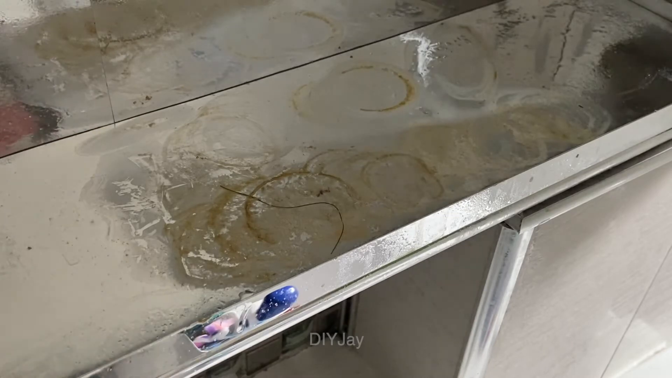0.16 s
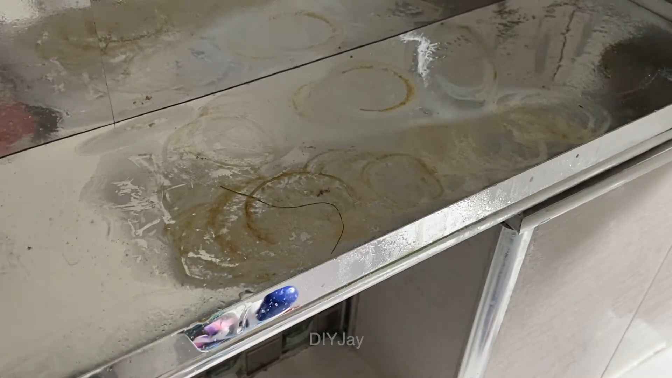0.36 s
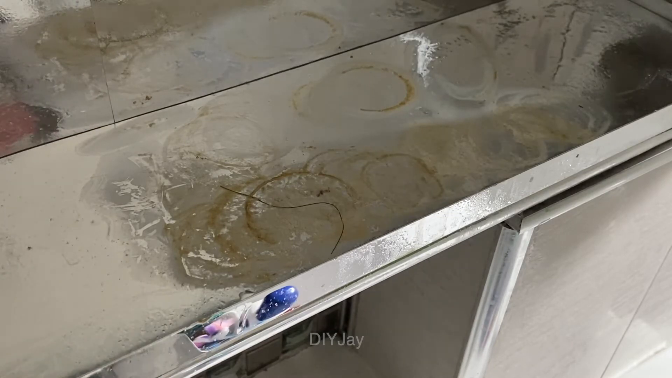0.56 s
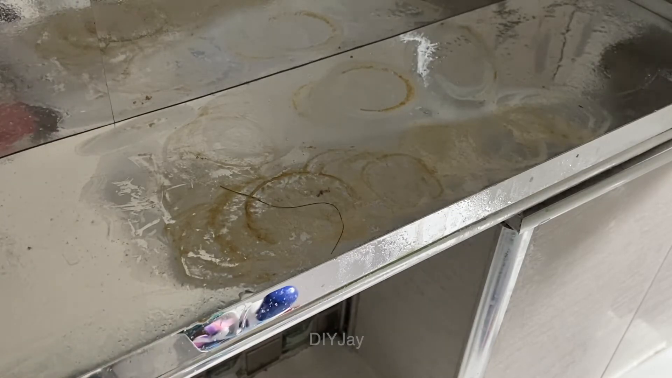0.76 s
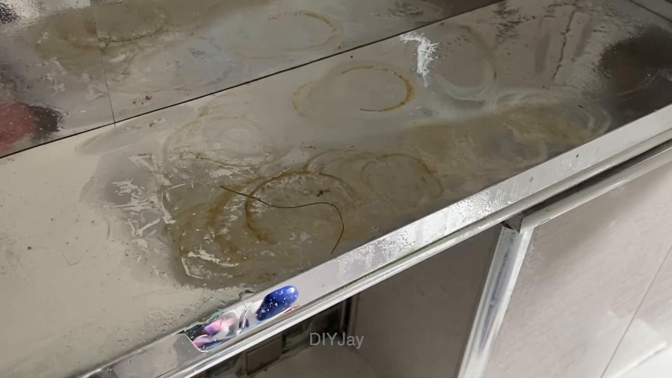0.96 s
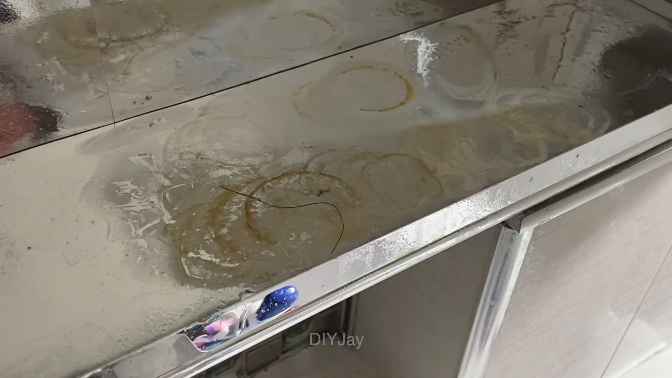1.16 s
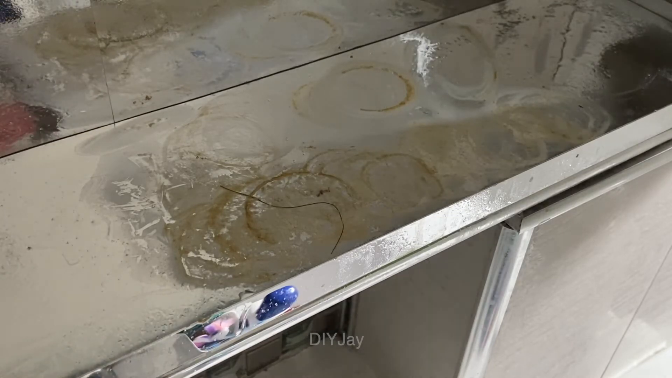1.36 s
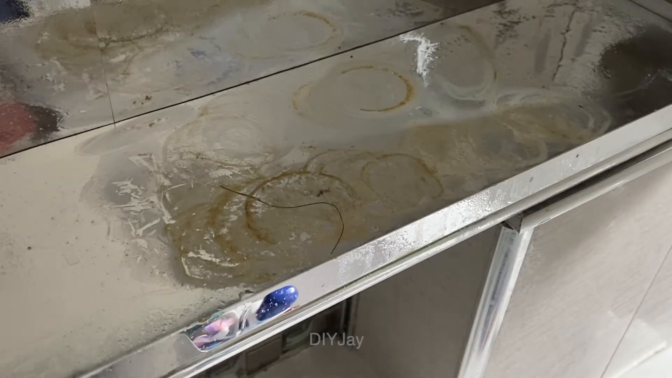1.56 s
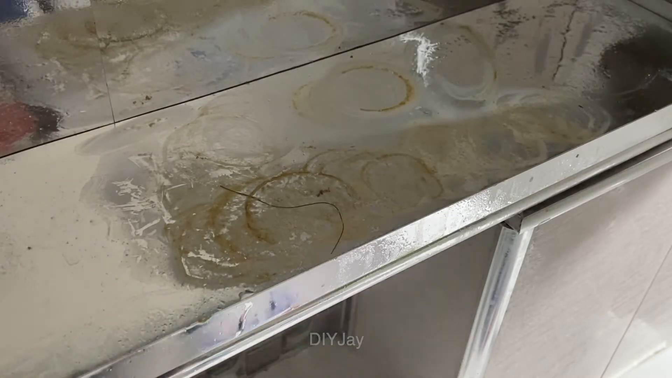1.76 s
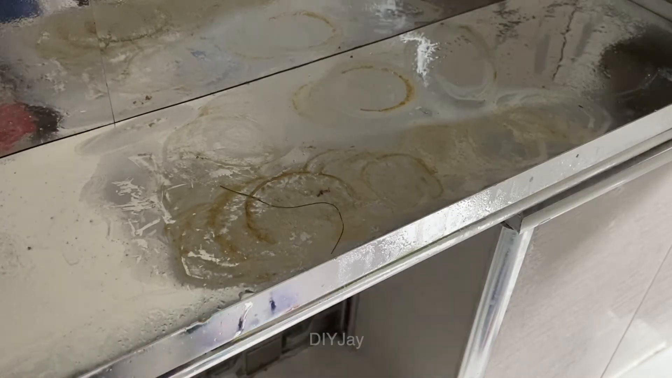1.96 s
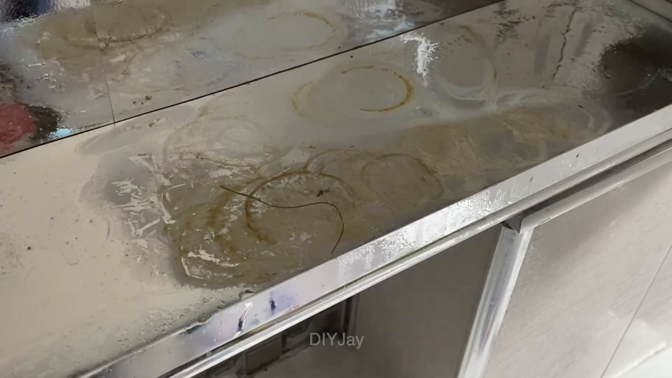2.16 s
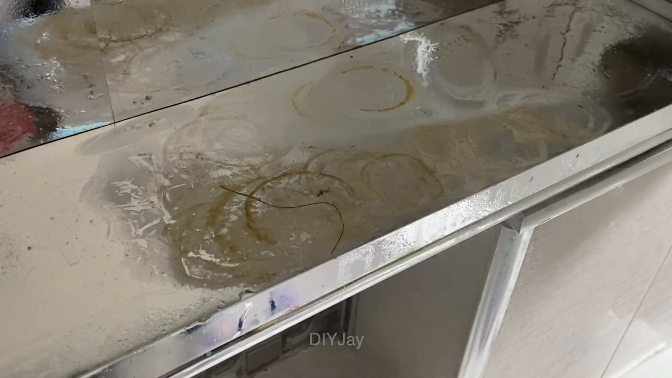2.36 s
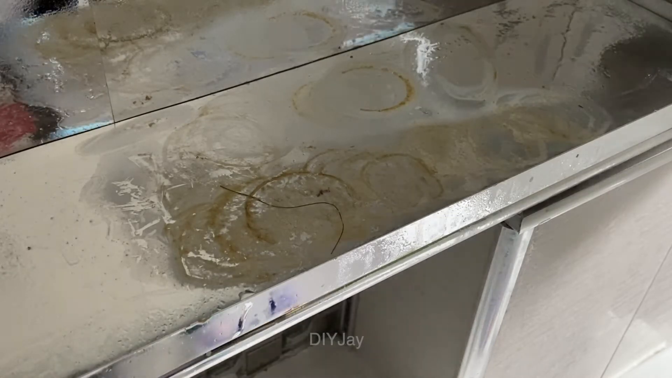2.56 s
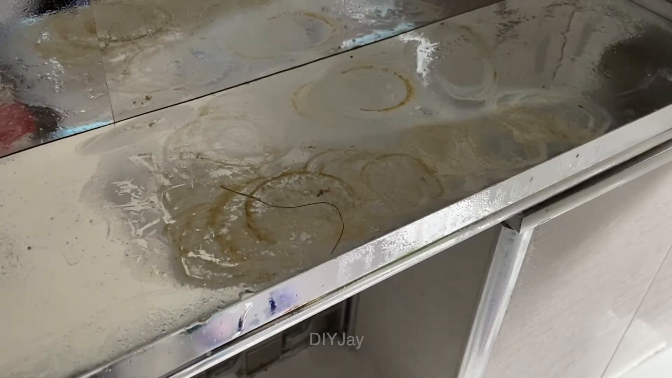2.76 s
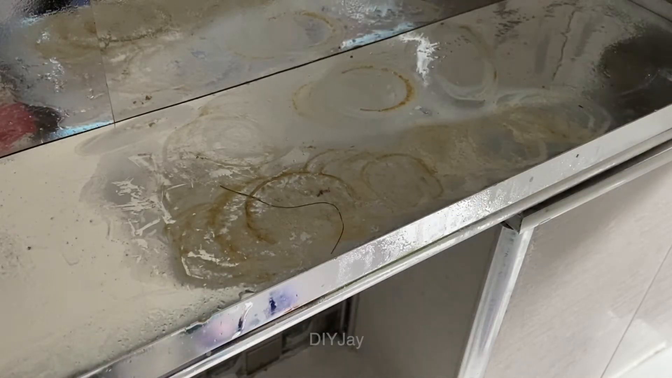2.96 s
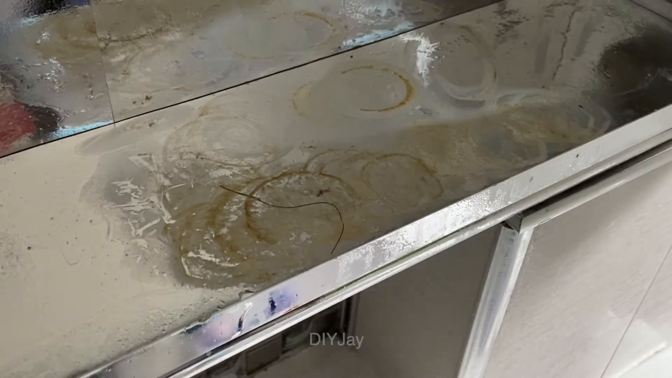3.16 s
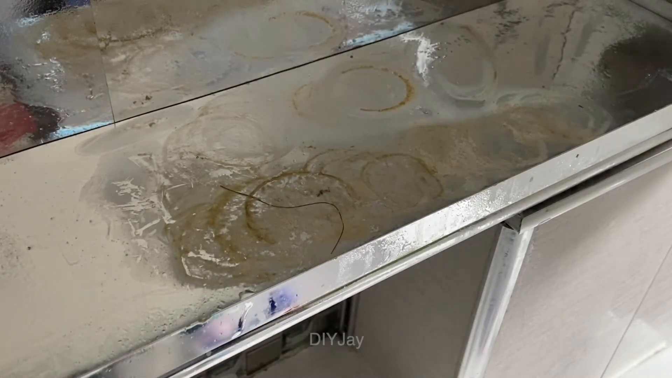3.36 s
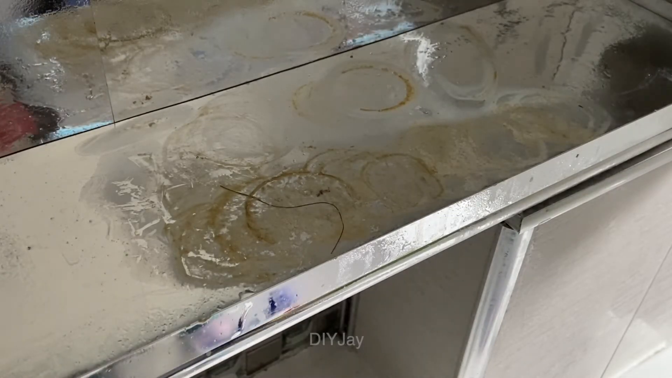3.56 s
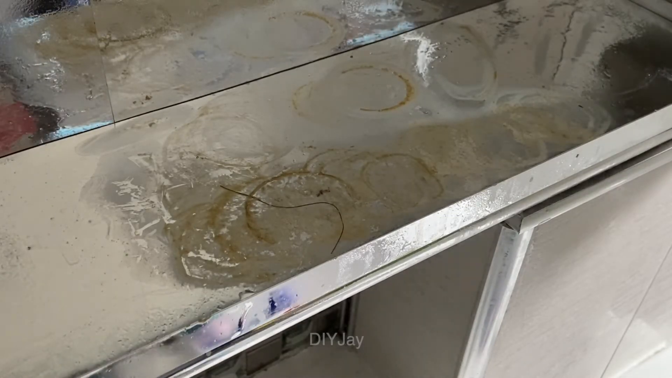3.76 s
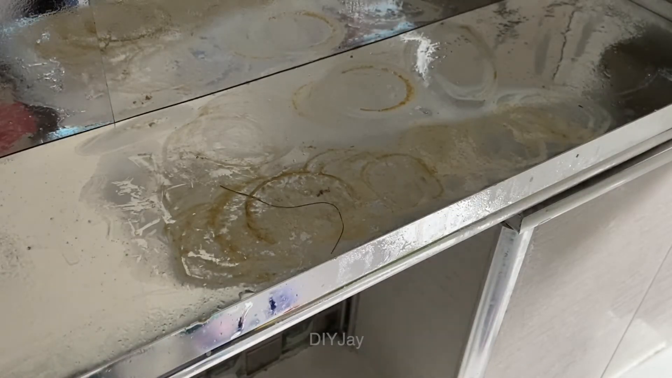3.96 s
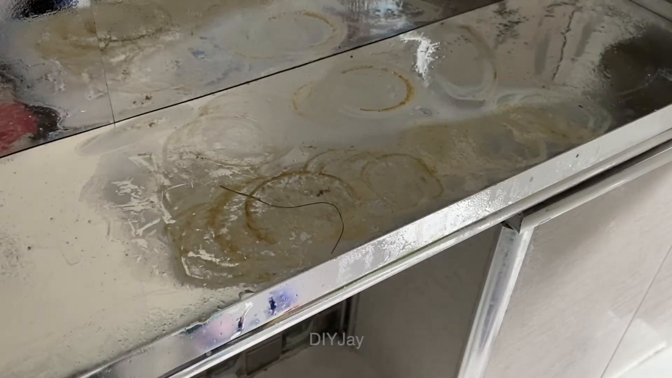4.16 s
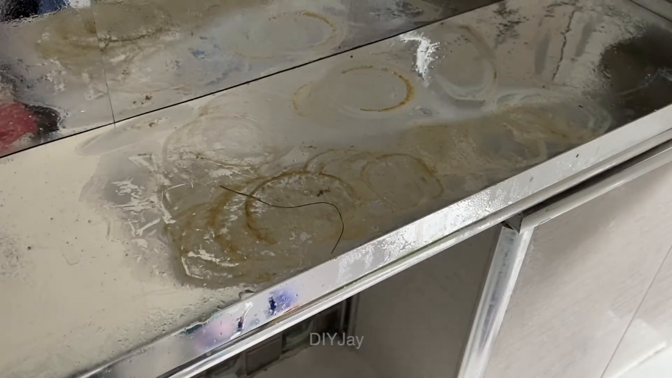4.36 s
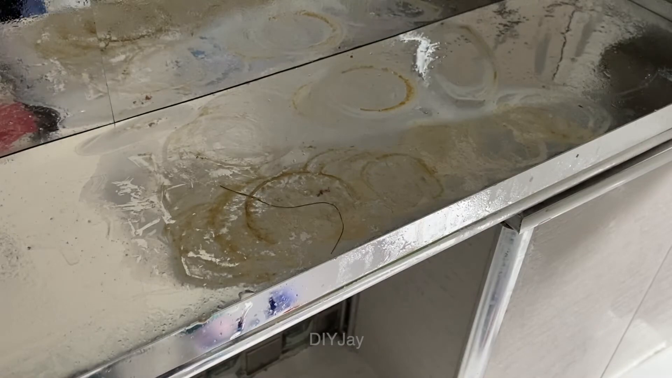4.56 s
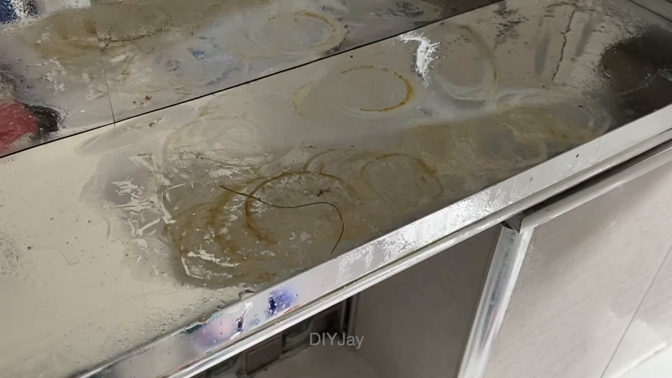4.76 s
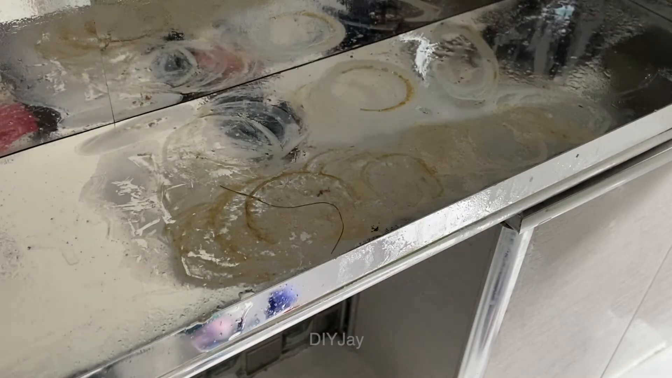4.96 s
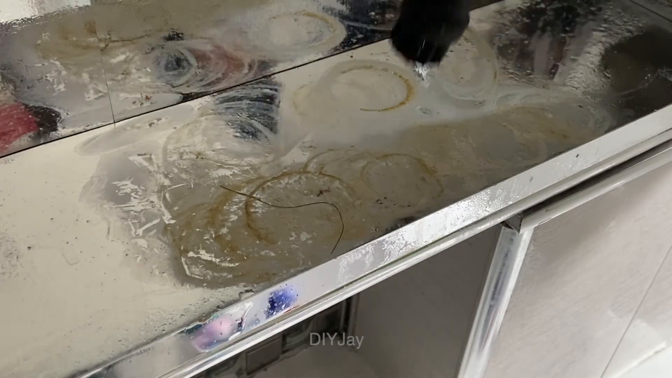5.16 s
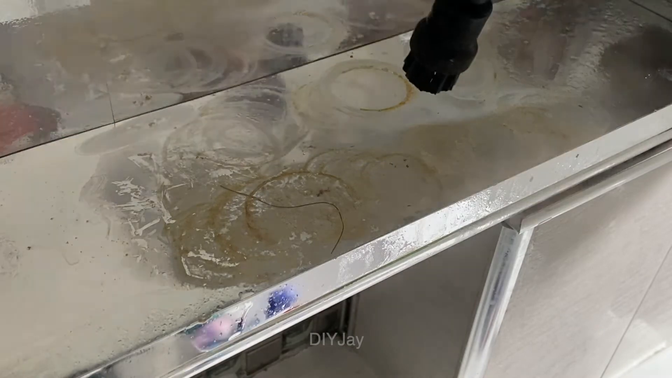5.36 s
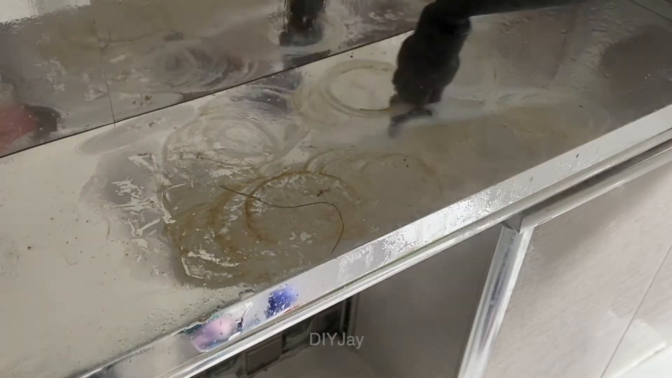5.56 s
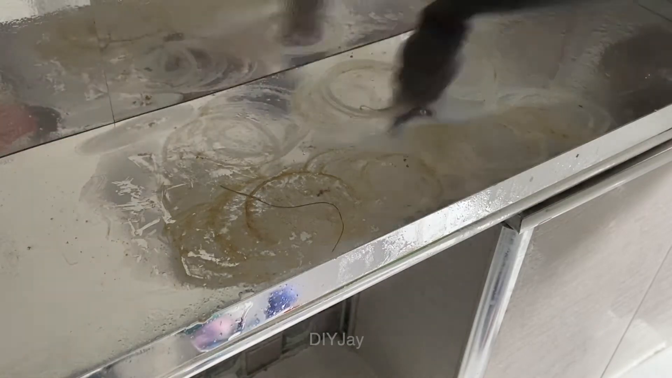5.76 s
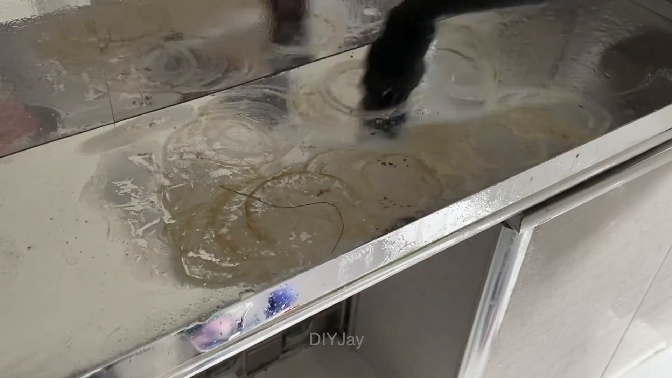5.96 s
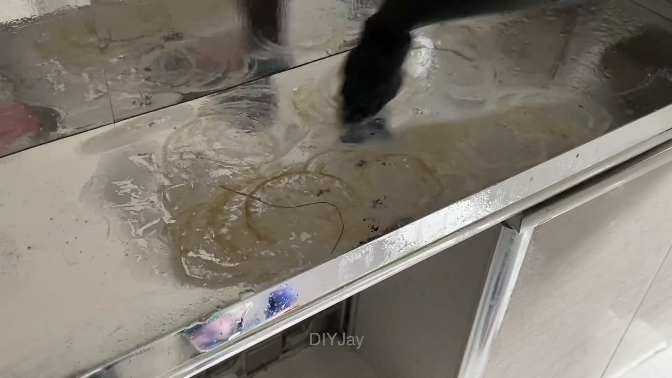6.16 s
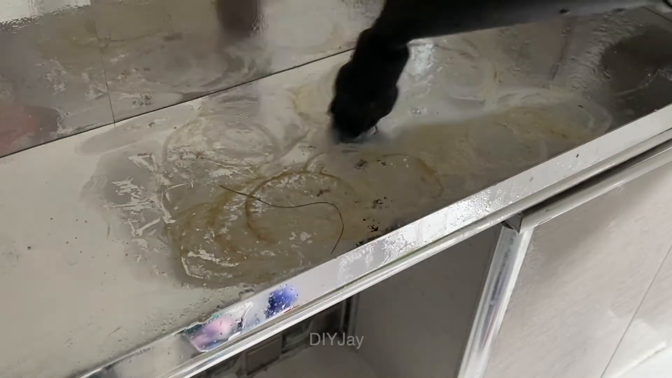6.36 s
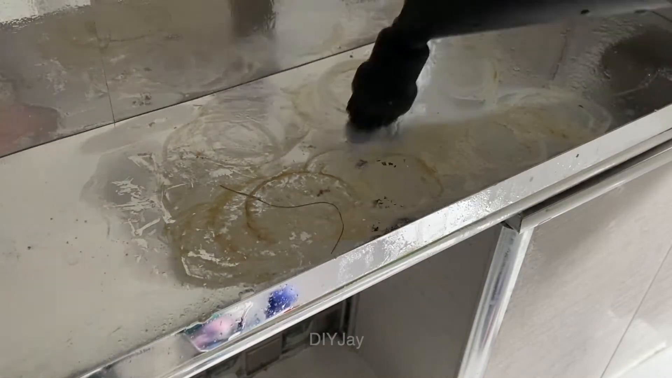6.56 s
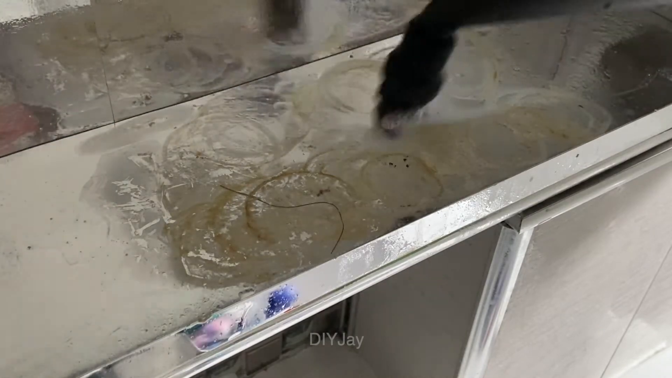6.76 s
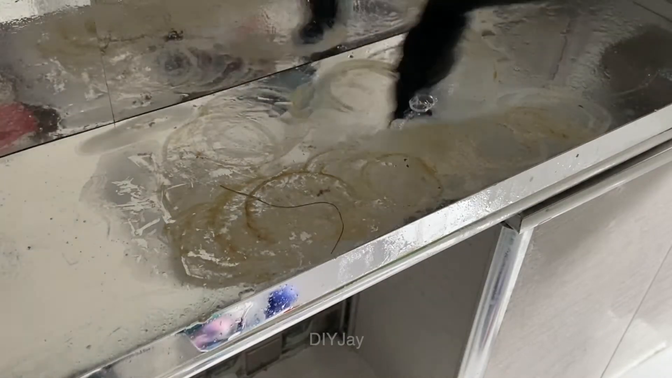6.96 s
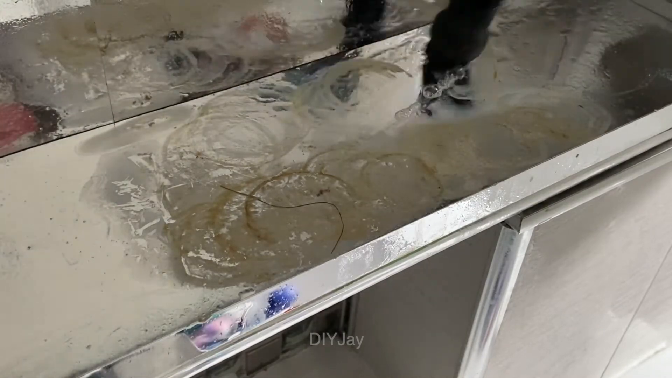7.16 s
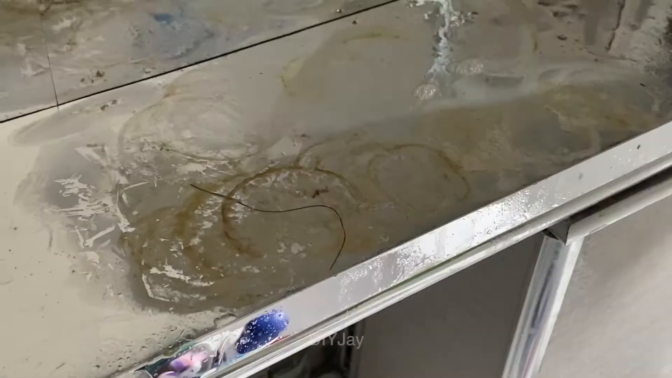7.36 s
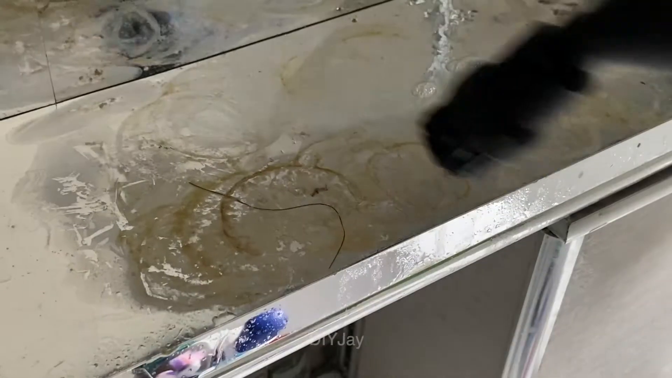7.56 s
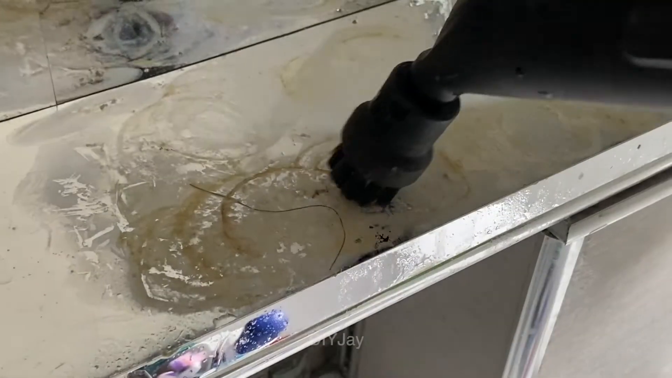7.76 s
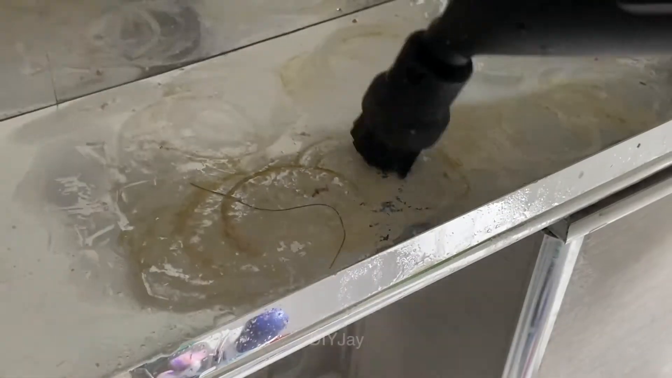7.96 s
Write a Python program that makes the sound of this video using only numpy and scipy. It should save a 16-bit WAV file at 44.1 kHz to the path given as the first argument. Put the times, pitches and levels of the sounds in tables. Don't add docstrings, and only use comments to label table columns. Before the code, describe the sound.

A steam cleaner blasts a long whistling hiss, pauses over a low pump hum with small clicks, then hisses in scrubbing bursts on a worktop.

```python
import sys
import numpy as np
from scipy import signal
from scipy.fft import rfft, irfft, next_fast_len
from scipy.io import wavfile
from scipy.ndimage import uniform_filter1d

SR = 44100
rng = np.random.default_rng(int(sys.argv[2]) if len(sys.argv) > 2 else 0)


def put_to_file(sound):
    columns = np.atleast_2d(sound).T
    safe = np.clip(columns, -1, 1)
    whole_steps = np.round(safe * 32767)
    wavfile.write(sys.argv[1], SR, whole_steps.astype(np.int16))


def to_linear_factor(level_db):
    exponent = np.asarray(level_db, float) / 20
    return 10 ** exponent


N = 353241
FRAME = 1024

# (frequency [Hz], density [dB per Hz])
DRONE_SPECTRUM = [(24, -32), (40, -2.5), (100, -3), (200, 2), (310, -4.5), (450, -14.5), (700, -11.5),
                  (1000, -26.5), (1500, -54.5)]
HUSH_SPECTRUM = [(500, -30), (900, 1), (1700, -2.5), (2500, -6.5), (4000, -10), (8000, -12.5), (14000, -18),
                 (15000, -35)]
# (time [s], length [s], level [dB])
STIRS = [
    (4.38, 0.074, 3),
    (4.63, .11, 10),
    (4.82, 0.045, 4.5),
    (5.1, 0.12, -3),
    (7.46, 0.038, 6),
    (7.63, 0.036, 5),
]
# (frequency [Hz], decay t60 [s])
KITCHEN_DECAY = [(300, 0.43), (2000, 0.37), (6000, 0.35), (12000, 0.25)]
# (start [s], end [s])
ANSWER_GAP = (7.377, 7.7)

# (frequency [Hz], density [dB per Hz])
HOSE_SPECTRUM = [(14, -45.5), (25, -23.5), (45, -5.5), (64, 2.5), (110, -3.5), (170, -4), (260, -16.5),
                 (400, -45.5)]
# (time [s], length [s], level over the rumble [dB])
GRIPS = [(0, 0.036, 13), (.62, 0.054, -4), (.79, 0.096, 9), (1.22, 0.22, 7.5), (1.63, .05, 7),
         (2.32, 0.056, 11.5), (2.74, .07, 9), (2.92, 0.037, 8.5), (3.55, 0.097, -2.5), (3.84, 0.043, 14.5),
         (3.95, .022, 19), (4.85, 0.13, 7), (5.26, .1, 2.5), (5.57, 0.11, -4), (5.84, 0.066, 5),
         (6.31, .06, -0.5), (6.69, 0.055, -1), (7.33, .04, 7.5), (7.715, 0.034, 18.5), (.35, .15, 4),
         (3.3, .04, 1)]

# (time [s], level of the strongest line [dB])
PUMP_LEVEL = [(0, -61.5), (.62, -74.5), (1, -58), (1.87, -58), (3.57, -54), (4.44, -56.5), (4.57, -63.5),
              (4.73, -55), (4.86, -60), (5.15, -55.5), (5.53, -56.5), (5.62, -65), (5.73, -53.5),
              (6.02, -60), (6.6, -55), (6.76, -59.5), (7.36, -56.5), (8.01, -60.5)]
# (multiple of mains, level [dB])
STROKE_LINES = [(2, -19), (3, -9), (4, 0), (5, -21), (6, -16), (8, -26), (9, -23), (10, -30), (14, -28)]

# (time [s], crack [dB], ring [Hz], ring [dB], hollow knock [dB])
TICKS = [(4.487, -66, 5500, -71, -80), (4.808, -59, 2000, -72, -68), (4.823, -67, 3500, -72, -76),
         (7.428, -56, 2410, -61, -70), (7.46, -70.5, 7500, -80, -80), (7.5, -76, 703, -72, -71),
         (7.62, -64, 2000, -64, -68), (7.63, -52, 1053, -49, -65), (7.701, -60.5, 7170, -68, -52),
         (7.708, -63, 1910, -54, -51), (7.723, -61, 5200, -69, -68), (7.739, -51, 3360, -38, -41),
         (7.742, -66, 10700, -54, -70), (7.765, -56, 3280, -48, -38.5)]
# (start [s], end [s])
HANDLE_SPAN = (7.4, 7.69)
# (time [s], peak [dB], settled pitch [Hz], t60 [s], share the pitch starts higher)
THUMPS = [
    (0.73, -30, 51.1, 0.12, .8),
    (2.919, -42, 95.5, 0.15, 1.2),
    (3.926, -31, 110, 0.1, 2.8),
    (7.3066, -31.5, 105, 0.064, 3.7),
    (7.706, -36, 120.8, .1, 1.36),
]
# (time [s], peak [dB], ring [Hz])
BRISTLE_JAMS = [(5.208, -45, 360), (5.315, -33, 815), (5.599, -45, 850), (5.855, -34, 870),
                (5.919, -26, 884), (6.025, -31, 310), (6.112, -29.5, 840), (6.236, -31, 860),
                (6.332, -23, 814), (6.463, -34, 837), (6.693, -44, 890), (6.877, -31.5, 852),
                (6.981, -51, 845), (7.089, -41.5, 770)]

# (valve shuts [s], scattered splash [dB], fizz tilt above 11 kHz [dB per octave])
BURST_ENDS = [
    (3.926, -0.5, 5),
    (7.306, -11, 0.5),
    (8.1, -9, 2.5),
]
# (time [s], level [dB])
FLOW = [
    [(0, -23.5), (.35, -27.5), (.61, -31.5), (.89, -24.5), (1.4, -24.5), (1.81, -29.5), (2.6, -30.5),
     (3.84, -31.5), (3.92, -37)],
    [(5.2, -65), (5.23, -41), (5.6, -30.5), (5.7, -23), (6.05, -29), (6.3, -21.5), (6.72, -23),
     (6.92, -34.5), (7.3, -49)],
    [(7.75, -77), (7.764, -70), (7.784, -37), (7.832, -29.5), (8.01, -28.5)],
]
# (body [dB], splash [dB], fizz under whistle [dB], fizz fade [dB per s], whistle [Hz])
BURST_MIX = [
    (-10.5, -24, -11, 0.87, 6300),
    (-6, -14, -6, 2.5, 6400),
    (-1.5, -12.5, -6, 2.5, 6100),
]
# (frequency [Hz], density [dB per Hz])
BODY_SPECTRUM = [(900, -29.5), (1800, -10.5), (2600, -1.5), (4200, 2.5), (6000, 0), (8000, -12.5),
                 (11000, -33)]
SPLASH_SPECTRUM = [(80, -24), (140, -3.5), (230, -17), (320, -4), (450, -8), (620, -7), (850, -1),
                   (1300, 0), (1600, 1.5), (2100, 2), (3200, -5), (5000, -37)]
FIZZ_SPECTRUM = [(4000, -27.5), (7000, 3), (8500, 0.5), (10000, 1), (13000, -0.5), (15500, 0)]
# (time [s], depth [dB])
FLUTTER = [(0, .8), (2.2, 1.2), (2.6, 2), (3.5, 2), (3.72, 1), (5.2, .6), (8, .8)]
# (time [s], length [s], whole jet [dB], band
# [dB], band [Hz])
SPURTS = [(1, 0.036, -3, -2, 6450), (1.1, 0.036, -7, -2.3, 6330), (1.1, 0.076, 2, 1, 6450),
          (2.27, 0.095, 1.5, 2, 6500), (2.2, 0.05, 0, 6, 6000), (3.3, 0.033, -1, 4.5, 13000),
          (2.69, 0.023, 0.3, 6.5, 5480), (2.85, 0.023, 2.5, 5, 6600), (2.94, 0.021, 0, 11, 4800),
          (3.044, 0.047, 0.5, 12.5, 6630), (3.162, 0.079, -0.7, 6, 4770), (3.7, 0.056, -0.3, 10.5, 7000),
          (3.43, 0.055, -1.2, 8.5, 6700), (3.563, 0.017, .8, 7, 7150), (3.79, 0.045, 4.5, 3.5, 6450),
          (3.89, 0.036, 2, 3.5, 7300), (5.27, 0.084, 2.7, 7, 3270), (2.72, 0.058, 0, 6, 1300),
          (3.113, 0.034, -0.4, 7, 1200), (1.9, 0.23, -0.5, 3.5, 1000), (5.3, 0.15, -0.5, -8.5, 1970),
          (6.4, 0.014, 2.5, 12, 980), (7.4, .3, 0, 2, 4500), (.3, 0.27, 0, 3, 1680),
          (1.4, .15, -0.5, 3.5, 1200), (2.78, 0.078, 0.5, 2, 1250), (.98, 0.22, 0, -2, 8500),
          (7.86, .1, 0, -3.5, 6900), (3.1, 0.55, -0.5, -4, 3800), (7.88, .12, 0, -0.5, 5400),
          (7.9, .12, 0, 1.5, 3600), (3.05, .3, 0, 2, 4700), (2.38, 0.094, 0, 8, 260),
          (5.7, .08, 0, 3, 4100), (6.33, .05, 1, 2, 4300), (6.4, .03, -1, -6, 900), (7.9, .1, 0, 3, 2600),
          (7.9, .1, 0, -2.5, 5750), (.25, .3, 0, 2, 2500), (5.3, .1, 0, -4, 620), (6.36, .03, 0, 3, 5000)]
# (time [s], length [s], level [dB], pitch [Hz])
PIPINGS = [(0.12, 0.085, 1.5, 6720), (0.24, 0.075, 5.5, 7490), (0.37, 0.15, 1.5, 6550),
           (0.48, 0.128, 7, 6550), (0.71, 0.047, 1, 7060), (0.82, 0.066, 5, 6120), (0.94, 0.126, 1, 6800),
           (1.02, 0.035, 1.5, 5250), (1.06, 0.15, 2, 6800), (1.07, 0.15, 2.5, 6890),
           (1.18, 0.079, -2, 6030), (1.18, 0.084, 2, 6120), (1.46, 0.064, 4, 6120), (1.7, 0.053, 1.5, 5770),
           (1.71, 0.098, 2.5, 6800), (1.71, 0.113, 3.3, 6890), (1.96, 0.098, 6, 6370),
           (2.11, 0.067, 4, 7060), (2.34, 0.12, 5, 6460), (2.54, 0.035, 3, 5940), (2.55, 0.065, 6, 7150),
           (2.84, 0.15, 3, 6460), (3.22, 0.079, 8.5, 7240), (3.79, 0.067, 2.5, 6460),
           (5.43, 0.059, 2, 7240), (5.56, 0.137, 3, 5000), (5.56, 0.142, 4, 4820), (5.67, 0.052, 4, 6370),
           (5.84, 0.07, -1.5, 7060), (6.02, 0.15, 2, 6800), (6.09, 0.15, 2, 6800), (6.22, 0.039, 4.5, 3270),
           (6.35, 0.056, 3, 5000), (6.44, 0.032, 5.5, 7840), (6.56, 0.139, 0.5, 6890),
           (6.63, 0.086, 2, 5080), (6.88, 0.049, -1, 6800), (7.79, 0.098, 7.5, 5080),
           (7.86, 0.109, 0.5, 5340), (7.98, 0.03, 5, 6630)]
# (time [s], length [s], whole jet [dB], whistle alone [dB], whistle [Hz])
SCRUBS = [(5.677, 0.047, 0, -1.5, 5100), (5.83, 0.034, 0, 4, 7000), (5.914, 0.048, 2, 0, 5700),
          (6.023, 0.027, 0.5, -2.5, 6800), (6.306, 0.016, 3, 0.5, 6130), (6.352, 0.023, 1.5, 0, 5370),
          (6.443, 0.053, -2, 1.5, 6750), (6.57, 0.04, 0.5, -2, 5330), (6.653, 0.06, -1.2, 3, 6700),
          (6.79, 0.053, -0.5, 1, 5270), (6.91, 0.044, -1, 3.5, 7000), (7.027, 0.041, 2.5, 5.5, 5050),
          (7.092, 0.027, -0.7, 4, 6700), (7.147, 0.02, 3.5, -7, 6350), (7.224, 0.056, 1.5, 7.5, 6620)]
# (time [s], length [s], splash [dB])
SWEEPS = [(.04, .05, 0.5), (1.08, 0.034, 3), (1.55, 0.15, 3), (2.17, 0.026, -6.5), (2.39, 0.077, -4.5),
          (2.66, 0.035, 1.5), (2.87, 0.031, 3), (3.12, 0.017, 2), (3.44, 0.035, -1.5), (3.83, 0.054, 2),
          (5.81, 0.019, 3.5), (6.33, 0.012, 4), (7.03, 0.026, 1.5)]
# (time [s], delay after direct [ms], share 0-1)
BOUNCES = [
    [(0, 1.23, 0.18), (.6, 1.2, 0.3), (.75, 1.38, 0.23), (1.7, 1.3, 0.23), (2, 1.25, 0), (3.5, 0.99, 0.09),
     (5.2, 1.03, 0.13), (6.3, 1.03, 0.07), (7, 0.88, 0.08)],
    [(0, 1.57, 0.12), (.55, 1.56, 0.1), (.75, 3, .22), (1.3, 3.6, 0.1), (1.7, 1.94, 0.12), (3.2, 1.6, 0.2),
     (3.9, 1.76, 0.13), (5.2, 2.28, 0.09), (7.3, 2.4, 0.18)],
    [(0, 1, 0), (.6, 0.93, 0), (1.8, 1.16, 0.07), (2.4, 0.82, 0.06), (2.85, 0.67, 0), (3.9, 0.39, 0.1),
     (5.6, 0.6, 0.12), (7.3, 0.59, 0.09), (7.75, 0.36, 0.22)],
]

# (frequency [Hz], lead [half turns])
BASS_LEAD = [(0, 0), (500, -.05), (1000, .25), (1600, -.1), (2200, 0)]
# (frequency [Hz], width [Hz])
LEAD_JUMPS = [(8280, 560), (10100, 1000), (12150, 1200), (14300, 1150)]
# (frequency [Hz], likeness 0-1)
LIKENESS = [(40, .975), (200, .9), (500, .5), (1700, .35), (2300, .994), (4500, .994), (5500, .987),
            (6300, .995), (7600, .998), (9000, .994), (16000, .993)]
# (frequency [Hz], left over right [dB])
LEFT_OVER_RIGHT = [(40, 0), (200, 3.5), (1300, 2.5), (2400, 0)]
# (time [s], restless lead at the cavity tone [rad], jumps slide [Hz], jumps shiver [Hz])
SWAY = [(0, .13, 130, 140), (3.9, .14, 130, 140), (5.2, .14, 40, 130), (5.8, .28, 80, 140),
        (7.3, .3, 30, 130), (7.75, 0, 90, 50), (8.01, 0, 90, 50)]


def unit(x):
    return x / np.sqrt(np.mean(x ** 2) + 1e-20)


def power_gain(db):
    return to_linear_factor(2 * db)


def along(points, hz):
    f, v = np.transpose(points)
    return np.interp(np.log(hz + 1), np.log(f + 1), v)


def curves(rows, t):
    s, *cols = np.transpose(rows)
    return [np.interp(t, s, c) for c in cols]


def bell(x, centre, width):
    return np.exp(-.5 * ((x - centre) / width) ** 2)


def bumps(rows, t):
    s, length, *cols = np.transpose(rows)
    return np.array(cols) @ bell(t, s[:, None], np.maximum(length, .01)[:, None])


def wobble(rate):
    knots = rng.standard_normal(int(N * rate / SR) + 2)
    return np.interp(np.arange(N) * rate / SR, np.arange(len(knots)), knots)


def patches(shape, size, count):
    field = uniform_filter1d(rng.standard_normal(shape), size, axis=0)
    return unit(uniform_filter1d(field, count, axis=1))


def filtered(x, response):
    m = next_fast_len(N + 8192)
    return irfft(rfft(x, m) * response(np.fft.rfftfreq(m, 1 / SR)), m)[..., :N]


def noise(spectrum):
    return unit(filtered(rng.standard_normal((2, N)), lambda hz: to_linear_factor(along(spectrum, hz))))


def dull(x, size):
    return uniform_filter1d(uniform_filter1d(x, size), max(size - 1, 1))


def kitchen_air():
    stir_db = bumps(STIRS, np.arange(N) / SR)[0]
    drone = to_linear_factor(-68.5 + 0.48 * stir_db) * noise(DRONE_SPECTRUM)
    hush = to_linear_factor(-87.5 + stir_db + wobble(7.4)) * noise(HUSH_SPECTRUM)
    return drone + hush


def kitchen_answer(x):
    hz, t, z = signal.stft(rng.standard_normal((2, SR // 2)), SR, nperseg=256)
    decay = to_linear_factor(-60 * t / along(KITCHEN_DECAY, hz)[:, None])
    tail = signal.istft(z * decay, SR, nperseg=256)[1]
    wet = signal.fftconvolve(x[None], tail / np.linalg.norm(tail[0]), axes=1)[:, :N]
    s = np.arange(N) / SR
    return wet * ((s < ANSWER_GAP[0]) | (s > ANSWER_GAP[1]))


def hose_rumble():
    still_db, flowing_db, tires_db_per_s = -70.5, -59, 2
    t = np.arange(N) / SR
    level_db = np.full(N, still_db)
    for rows, (shut, *_) in zip(FLOW, BURST_ENDS):
        opened = rows[0][0]
        inside = (t >= opened) & (t < shut)
        level_db[inside] = flowing_db - tires_db_per_s * (t[inside] - opened)
    level_db = uniform_filter1d(level_db, size=3000) + bumps(GRIPS, t)[0]
    return to_linear_factor(level_db) * unit(to_linear_factor(2.7 * wobble(15)) * noise(HOSE_SPECTRUM))


def pump():
    mains_hz = 50
    t = np.arange(N) / SR
    turns = mains_hz * t + 0.0027 * wobble(4.5)
    lines = 0
    for multiple, db in STROKE_LINES:
        lines = lines + to_linear_factor(db + 1.4 * wobble(5)) * np.sin(2 * np.pi * (multiple * turns + rng.random()))
    return np.sqrt(2) * to_linear_factor(curves(PUMP_LEVEL, t)[0]) * lines


def ticks():
    out, t = np.zeros(N + SR), np.arange(SR // 5) / SR
    for s, crack_db, hz, ring_db, knock_db in TICKS:
        if s < HANDLE_SPAN[1]:
            dullness = 4 if s > HANDLE_SPAN[0] else 2
        else:
            dullness = 1
        crack = to_linear_factor(crack_db - 60 * t / 0.024) * dull(rng.standard_normal(len(t)), dullness)
        ring = to_linear_factor(ring_db - 60 * t / 0.021) * np.sin(2 * np.pi * hz * t)
        shell_hz = rng.uniform(400, 1250, size=3)
        hollow = np.sin(2 * np.pi * np.outer(t, shell_hz)).sum(axis=1)
        hollow = hollow * (1 - np.exp(-t / 0.00061)) * to_linear_factor(knock_db - 60 * t / 0.022)
        out[round(s * SR):][:len(t)] += crack + ring + hollow
    return out[:N]


def thumps():
    settle_s = 0.0037
    out, t = np.zeros(N + SR), np.arange(SR // 5) / SR
    for s, db, hz, t60, higher in THUMPS:
        sinking = t + higher * settle_s * (1 - np.exp(-t / settle_s))
        swing = np.sin(2 * np.pi * hz * sinking) * (1 - np.exp(-t / 0.0011))
        out[round(s * SR):][:len(t)] += to_linear_factor(db - 5.5 - 60 * t / t60) * swing
    return out[:N]


def brush():
    out, t = np.zeros(N + SR), np.arange(SR // 10) / SR
    for s, db, hz in BRISTLE_JAMS:
        puff = uniform_filter1d(rng.standard_normal(len(t)), size=14)
        puff = 3 * (puff - uniform_filter1d(puff, size=200))
        shape = (1 - np.exp(-t / 0.0038)) * to_linear_factor(db - 3 - 60 * t / 0.07)
        out[round(s * SR):][:len(t)] += shape * (puff + np.sin(2 * np.pi * hz * t))
    return out[:N]


def steam_flow(t, open_s=0.011, shut_s=0.0034):
    flow = np.zeros(N)
    for rows, (shut, *_) in zip(FLOW, BURST_ENDS):
        opening = np.clip((t - rows[0][0]) / open_s + 1, 0, 1)
        closing = np.clip((shut - t) / shut_s, 0, 1)
        flow += (opening * closing) ** 2 * to_linear_factor(curves(rows, t)[0] - 1)
    return flow * to_linear_factor(bumps(SPURTS, t)[0] + bumps(SCRUBS, t)[0])


def jet_colour(s):
    full_db, least_db = -26, -46
    body_lags, splash_lags, fizz_lags = 0.25, 0.58, 0.12
    squeeze_db_per_octave = 3.5
    burst = np.searchsorted([row[0] for row in BURST_ENDS], s - .1)
    body_db, splash_db, fizz_db, fades, free_hz = np.transpose(BURST_MIX)[:, burst]
    over = np.maximum(curves(np.vstack(FLOW), s)[0], least_db) - full_db
    since = s - np.array([rows[0][0] for rows in FLOW])[burst]
    pull, pitch = bumps([(at, length, 1, hz) for at, length, _, _, hz in SCRUBS], s)
    whistle_hz = (free_hz * np.maximum(1 - pull, 0) + pitch) / np.maximum(pull, 1)
    whistle_db = bumps(SCRUBS, s)[1]
    body_db = body_db + squeeze_db_per_octave * np.log2(free_hz / whistle_hz) - body_lags * over
    splash_db = splash_db - splash_lags * over + bumps(SWEEPS, s)[0]
    fizz_db = fizz_db - fizz_lags * over - fades * since
    return burst, whistle_db, body_db, splash_db, fizz_db, whistle_hz


def band_power(power, hz, band):
    inside = (hz > band[0]) & (hz < band[1])
    return power / np.sum(power * inside, axis=0) * SR / 2 / (SR / FRAME)


def jet_power(hz, s, width_hz=1500):
    burst, whistle_db, body_db, splash_db, fizz_db, whistle_hz = jet_colour(s)
    whistle = 1 / (1 + ((hz * hz - whistle_hz ** 2) / (2 * hz * width_hz + 1)) ** 2) ** 2
    fluttering = np.clip(patches(whistle.shape, size=6, count=5), -3, 1.7)
    whistle = whistle * power_gain(curves(FLUTTER, s)[0] * fluttering)
    whistle = power_gain(whistle_db) * band_power(whistle, hz, (4500, 8000))

    body = power_gain(along(BODY_SPECTRUM, hz))
    body = power_gain(body_db - 0.25) * band_power(body, hz, (2000, 4500))

    _, scatter_db, tilt_db = np.transpose(BURST_ENDS)
    fizz_shape_db = along(FIZZ_SPECTRUM, hz) + tilt_db[burst] * np.log2(np.maximum(hz / 11000, 1))
    fizz = power_gain(fizz_db) * band_power(power_gain(fizz_shape_db), hz, (10300, 11800))

    splash = power_gain(along(SPLASH_SPECTRUM, hz))
    splash = power_gain(splash_db + 2.25) * band_power(splash, hz, (400, 2000))

    scatter = power_gain(scatter_db[burst])
    jet = whistle + body + fizz
    power = np.array([jet + splash, jet * np.where(hz < 2300, scatter, 1) + splash * scatter])
    for at, length, _, db, pipe_hz in SPURTS:
        power = power * power_gain(db * bell(s, at, length) * bell(hz, pipe_hz, 200))
    for at, length, db, pipe_hz in PIPINGS:
        power = power * power_gain(0.48 * db * bell(s, at, length) * bell(hz, pipe_hz, 200))
    return power


def surface_comb(hz, s):
    paths = [curves(rows, s) for rows in BOUNCES]
    comb = abs(1 + sum(g * np.exp(-2j * np.pi * hz * ms / 1000) for ms, g in paths))
    return comb / np.sqrt(1 + sum(g ** 2 for _, g in paths))


def steam(patchy_db=1.53, sputter_db=1.08, drops_db=0.56):
    tearing = to_linear_factor(sputter_db * wobble(45) + drops_db * wobble(700) + 0.23 * wobble(5))
    turbulence = rng.standard_normal((2, N)) * unit(tearing)
    hz, s, z = signal.stft(turbulence, SR, nperseg=FRAME)
    hz = hz[:, None]
    gain = np.sqrt(jet_power(hz, s)) * surface_comb(hz, s)
    gain = gain * to_linear_factor(patchy_db * patches(z.shape[1:], size=7, count=8))
    hiss = signal.istft(z * gain, SR, nperseg=FRAME)[1][:, :N]
    return hiss * steam_flow(np.arange(N) / SR)


def treble_lead(hz):
    creep, creep_from_hz, half_turn_hz = .14, 7000, 2070
    jumps = sum(np.clip((hz - at) / width + .5, 0, 1) for at, width in LEAD_JUMPS)
    return (1 - creep) * jumps + creep * np.maximum(hz - creep_from_hz, 0) / half_turn_hz


def ports(hz, blur=0.63):
    lead = np.interp(hz, *np.transpose(BASS_LEAD)) + treble_lead(hz)
    alike = along(LIKENESS, hz) - blur * np.sin(np.pi * lead) ** 4
    turn = np.arccos(np.clip(alike, -1, 1)) / 2
    half = to_linear_factor(along(LEFT_OVER_RIGHT, hz) / 2) * np.exp(-.5j * np.pi * lead)
    left = [half * np.cos(turn), half * np.sin(turn)]
    right = [np.cos(turn) / half, -np.sin(turn) / half]
    return np.array([left, right])


def sway(pair):
    cavity_hz, cavity_width_hz = 5500, 600
    hz, s, z = signal.stft(pair, SR, nperseg=FRAME)
    hz = hz[:, None]
    restless, slide, shiver = curves(SWAY, s)
    field = patches(z.shape[1:], size=20, count=5)
    moved_hz = hz - slide - shiver * patches(z.shape[1:], size=40, count=4)
    moved = treble_lead(moved_hz) - treble_lead(hz)
    lead = restless * field * bell(hz, cavity_hz, cavity_width_hz) + np.pi * moved
    return signal.istft(z * np.exp(-.5j * np.array([lead, -lead])), SR, nperseg=FRAME)[1][:, :N]


def scene():
    background = kitchen_air() + hose_rumble()
    hits = ticks() + thumps() + brush()
    jet = steam()
    sound = background + jet + to_linear_factor(-11) * kitchen_answer(jet[0] + hits)
    sound[0] += hits + pump()
    return sway(filtered(sound, ports).sum(axis=1))


def band_limit(x):
    return signal.sosfilt(signal.butter(12, 17080, fs=SR, output="sos"), x)


def record(dry):
    def response(hz):
        treble_limit = np.clip((15870 - hz) / 120, 0, 1) ** 2
        return treble_limit / np.sqrt(1 + (30 / (hz + 1)) ** 4)
    return band_limit(filtered(dry, response))


dry = scene()
out = record(dry)
put_to_file(out)
```